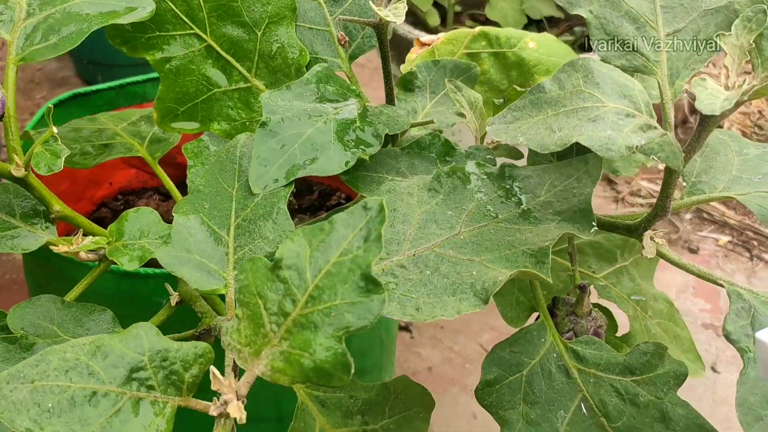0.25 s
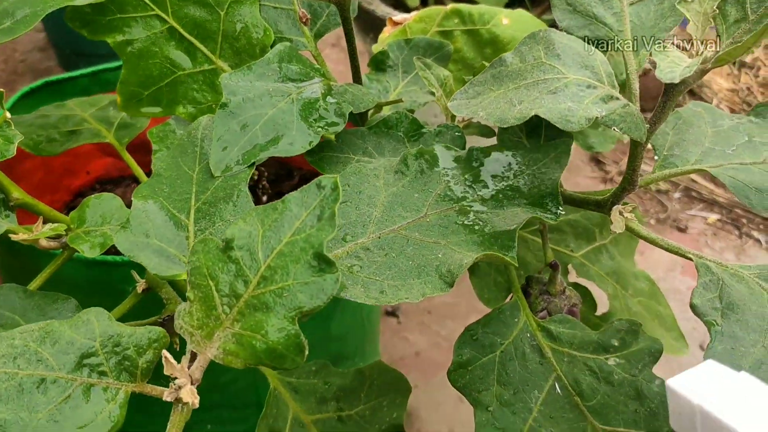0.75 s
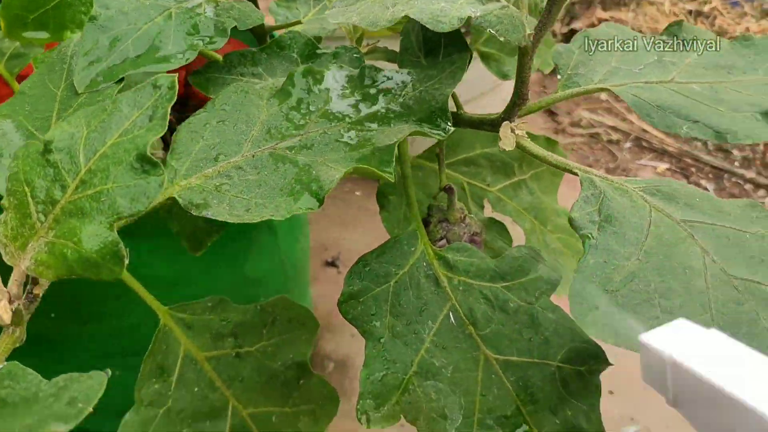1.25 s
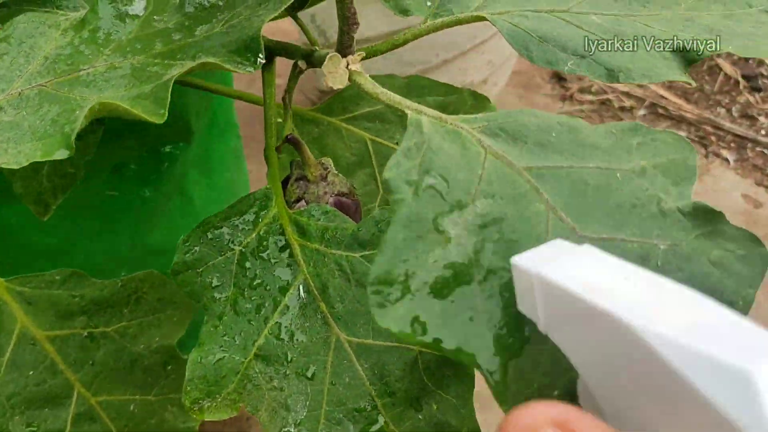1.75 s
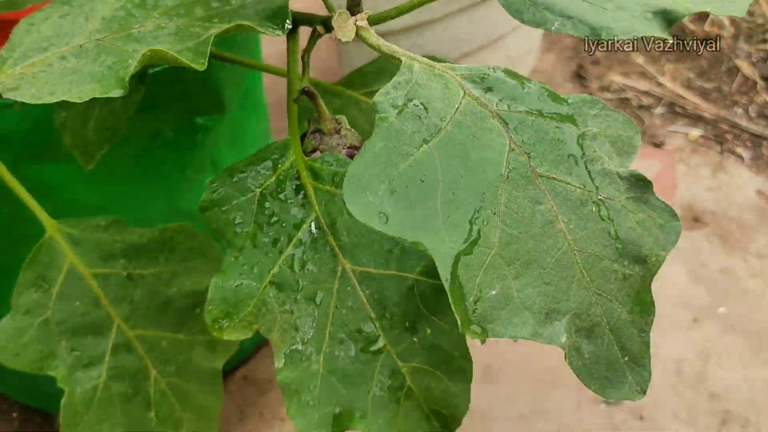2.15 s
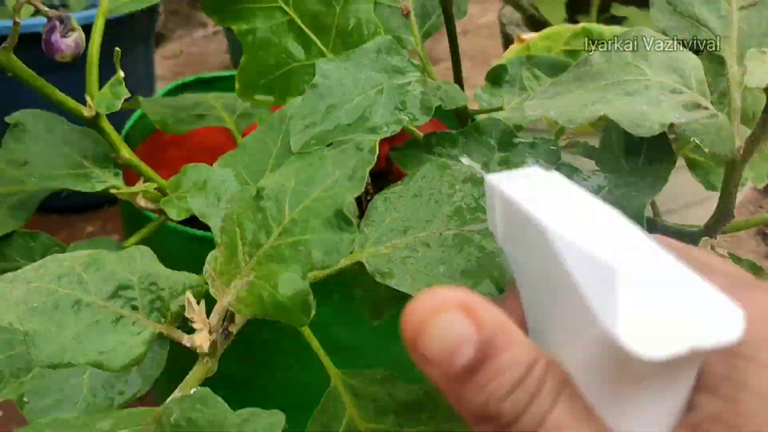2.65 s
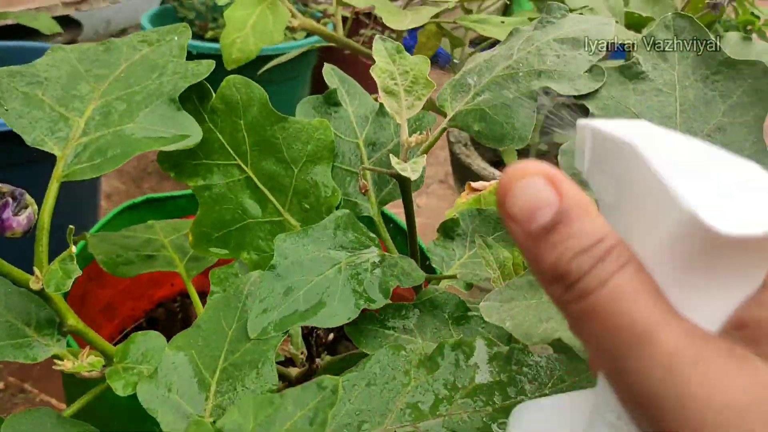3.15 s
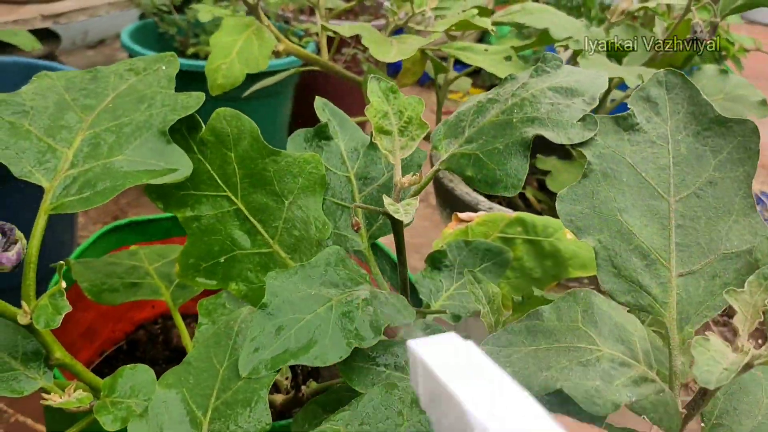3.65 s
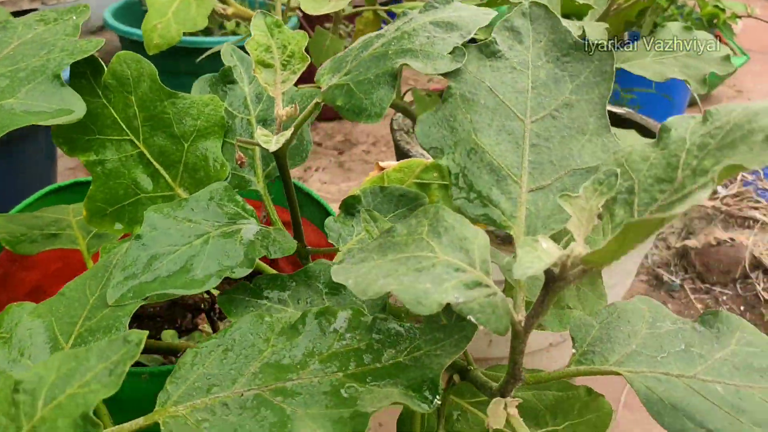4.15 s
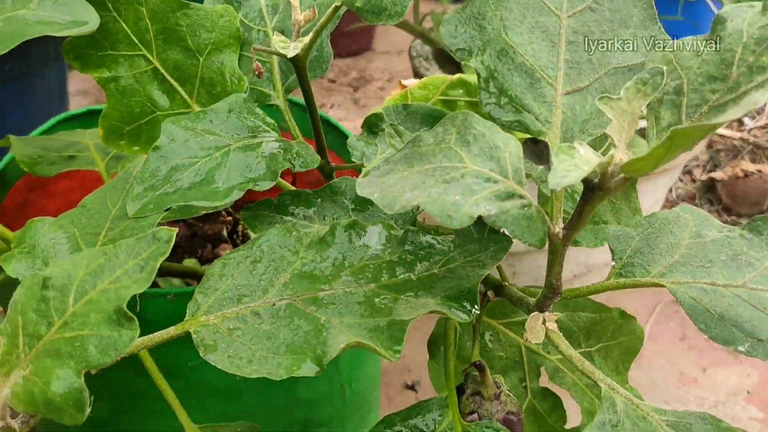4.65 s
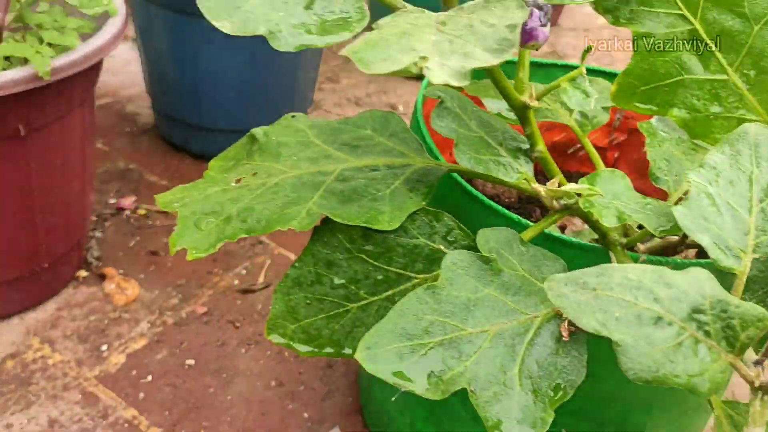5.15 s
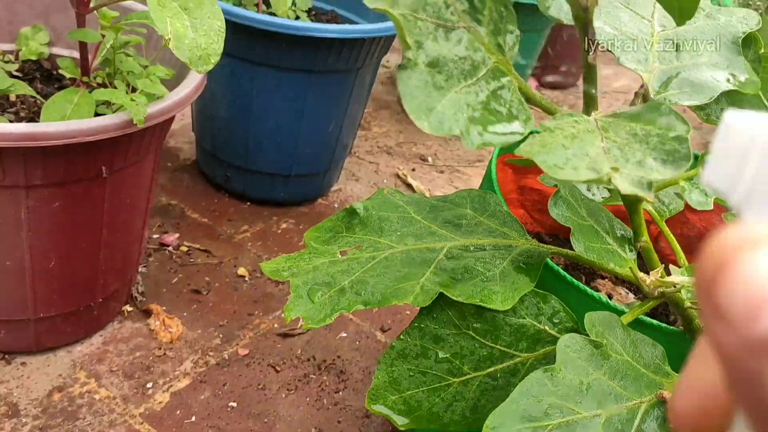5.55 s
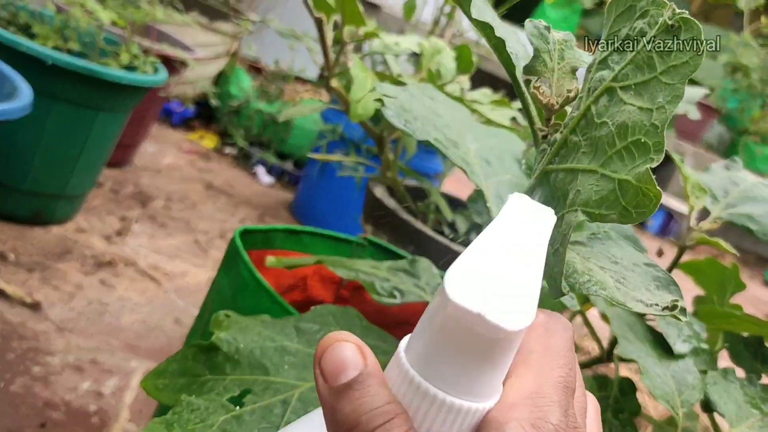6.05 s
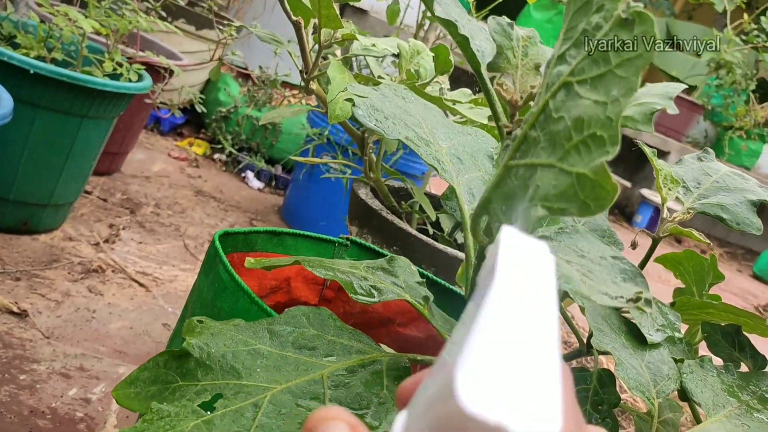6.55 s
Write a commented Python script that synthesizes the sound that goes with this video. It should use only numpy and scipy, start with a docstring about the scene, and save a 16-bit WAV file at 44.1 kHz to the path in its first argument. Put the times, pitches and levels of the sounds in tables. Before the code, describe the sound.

Close, rapid spray-bottle squirts hiss and patter on leaves, each with a hollow pump knock and trigger click, over a soft breezy garden background.

```python
"""Garden: a hand-held trigger bottle squirts water onto leaves, about four times a second, close by.
Each stroke: water churns in the pump, mist hisses out and patters down; piston knocks and trigger clicks
are decaying modes with noise. Air sips back through the nozzle as gliding noise bands in hiss.
Light wind buffets the two microphone ports; the yard answers with a faint echo."""
import sys
import numpy as np
from scipy import signal
from scipy.fft import rfft, irfft, next_fast_len
from scipy.io import wavfile
from scipy.ndimage import map_coordinates

SR = 44100
rng = np.random.default_rng(int(sys.argv[2]) if len(sys.argv) > 2 else 0)


def to_wav(s):
    """Save 16-bit WAV."""
    ch = np.atleast_2d(s).T  # columns
    pcm = np.round(np.clip(ch, -1, 1) * 32767)  # PCM
    wavfile.write(sys.argv[1], SR, pcm.astype(np.int16))


N = 299439

# pump strokes: [jet centre t/s, jet length/s, relative hiss level/dB, relative body level/dB,
# centre of the jet's colour peak f/Hz, churn lead before the jet/s, relative churn level/dB]
STROKE_ROWS = [(0.231, 0.069, -44.5, -8.5, 6000, .04, -67), (0.449, 0.077, -44.5, -14, 1500, 0.026, -40.5),
               (.672, 0.08, -51.5, -0.5, 8750, 0.037, -42.5), (0.897, 0.076, -52, -2.5, 1500, 0.039, -49.5),
               (1.128, 0.053, -49.5, -6.5, 5130, 0.048, -42), (1.341, 0.092, -49, -7.5, 1350, 0.037, -44),
               (1.561, 0.057, -42, -3, 7500, 0.04, -39.5), (1.78, 0.05, -38.5, -2, 2800, 0.049, -47.5),
               (1.997, 0.053, -41, -3.5, 3730, 0.03, -40.5), (2.206, 0.051, -46, -8.5, 1360, 0.041, -40),
               (2.414, 0.046, -38, -2, 2660, .037, -43), (2.602, 0.065, -50.5, -7, 1400, 0.028, -41.5),
               (2.801, 0.091, -50, -5.5, 4650, 0.022, -50), (3.004, 0.044, -43, -10.5, 1400, .007, -38),
               (3.215, 0.074, -50, -6.5, 1380, 0.021, -41), (3.534, 0.043, -44.5, -13.5, 5540, .06, -56),
               (3.749, 0.054, -41.5, -24, 6400, 0.037, -39), (3.983, .045, -52.5, 0, 7850, 0.056, -42.5),
               (4.194, 0.052, -48, -5, 3750, 0.045, -42.5), (4.418, 0.055, -44.5, -5.5, 3980, 0.033, -36.5),
               (4.641, 0.081, -50, -2, 2970, 0.045, -41), (4.867, 0.048, -51, -5, 1500, 0.099, -44.5),
               (5.111, 0.056, -53.5, -9.5, 5270, 0.12, -40.5),
               (5.285, 0.089, -57, -5.5, 4700, 0.0036, -42.5), (5.547, .051, -39, -6, 6760, 0.047, -59),
               (5.775, 0.064, -43, -2.5, 7160, 0.12, -46.5), (6.131, 0.043, -51.5, -8, 1900, 0.053, -59),
               (6.378, 0.053, -52, -6, 1850, 0.041, -54), (6.638, 0.046, -54.5, -4, 1840, 0.14, -57.5)]
# piston knocks in the filled bottle:
# [t/s, relative level/dB, nominal pitch f/Hz, hardness of the upper modes/(dB per octave)]
KNOCK_ROWS = [(.326, -37, 530, 3.5), (0.537, -35, 460, 2), (0.765, -35.5, 460, -6), (.991, -35, 450, -6),
              (1.039, -36.5, 520, 9), (1.209, -33.5, 440, -4), (1.299, -32, 514, 4), (1.422, -32, 458, 4.5),
              (1.693, -36.5, 807, 5), (1.87, -32, 440, 6), (2.082, -33, 455, -13), (2.277, -32, 420, -2.5),
              (2.495, -35, 445, 2), (2.696, -31.5, 466, 4.5), (2.912, -28, 714, 0.5), (3.0, -29, 497, 5.5),
              (3.106, -24, 453, 3), (3.319, -29.5, 450, -10), (3.621, -33, 417, 6), (3.833, -34, 495, 7),
              (3.888, -37.5, 805, 0), (4.061, -34, 412, 5.5), (4.294, -31.5, 418, -3),
              (4.507, -38, 436, -7), (4.729, -33.5, 454, 3.5), (4.817, -33, 480, 6), (4.961, -28.5, 680, 0),
              (5.048, -37.5, 818, 1), (5.192, -32, 377, 4), (5.428, -36.5, 546, 1.5),
              (5.492, -34, 636, -10), (5.632, -36.5, 793, 3.5), (5.731, -29.5, 790, 3.5),
              (5.867, -41, 803, 1), (6.241, -41, 627, 15), (6.328, -42.5, 620, 3), (6.478, -37.5, 553, -15),
              (6.502, -33.5, 587, -24), (6.585, -40.5, 580, -7), (6.75, -30, 648, 9.5)]
# light taps on the bottle wall: [nominal f/Hz, relative level/dB, t60/s]
WALL_MODES = [(250, -10.5, 0.03), (526, 2, 0.02), (807, -1.5, 0.018), (1500, -3.5, 0.015)]
# spectrum of the fine spray hiss: [f/Hz, relative level/dB]
HISS_SPECTRUM = [(300, -50), (1500, -5), (3000, -5), (4500, -5.5), (7000, -2.5), (9500, 1.5), (12000, -3.5),
                 (15000, -8.5), (16500, -25)]
# spectrum of the pump's rough noise: [f/Hz, relative level/dB]
PUMP_SPECTRUM = [(120, -53), (240, -0.5), (330, -12), (480, 0), (780, -3), (1100, -12.5), (1500, -9),
                 (2500, -14.5), (6000, -30.5), (15000, -26.5)]


def amp(db):
    """Amplitude ratio of a level in dB."""
    return 10 ** (np.asarray(db) / 20)


def unit(x):
    """x scaled to rms 1."""
    return x / np.sqrt(np.mean(x ** 2) + 1e-20)


def along(points, hz):
    """(Hz, value) points interpolated on a log frequency axis."""
    f, v = np.transpose(points)
    return np.interp(np.log(hz + 1), np.log(f + 1), v)


def at(rows, when_s):
    """Each column after the time, interpolated at the given moments."""
    s, *cols = np.transpose(rows)
    return [np.interp(when_s, s, c) for c in cols]


def wobble(rate_hz):
    """A smooth random curve, rate_hz knots a second."""
    knots = rng.standard_normal(int(N * rate_hz / SR) + 4)
    return map_coordinates(knots, [np.arange(N) * rate_hz / SR])


def filtered(x, response):
    """x shaped by a gain over frequency."""
    m = next_fast_len(N + SR // 2)
    return irfft(rfft(x, m) * response(np.fft.rfftfreq(m, 1 / SR)), m)[..., :N]


def stereo(mid, side, side_db):
    """Left and right from a shared part and a difference."""
    return np.array([mid + amp(side_db) * side, mid - amp(side_db) * side])


def panned(db):
    """Channel gains for a left-right level difference."""
    halves = [[db / 2], [-db / 2]] if np.ndim(db) == 0 else [db / 2, -db / 2]
    gain = amp(halves)
    return gain / np.sqrt(np.mean(gain ** 2, axis=0))


def rush(spectrum, side_db, grain_db=0, grain_hz=500):
    """Coloured stereo noise whose strength flutters in short grains."""
    white = rng.standard_normal((2, N)) * amp(grain_db * wobble(grain_hz))
    coloured = unit(filtered(white, lambda hz: amp(along(spectrum, hz))))
    return stereo(*coloured, side_db)


def swell(t, length_s, steep):
    """A rounded rise and fall around t = 0."""
    return np.exp(-np.abs(2 * t / length_s) ** steep / 2)


def add(track, s, sound):
    """Mix a sound into the track at a time."""
    i = round(s * SR)
    a, b = max(i, 0), min(i + sound.shape[-1], N)
    if a < b:
        track[..., a:b] += sound[..., a - i:b - i]


def speckle(hz, depth_db, spacing_hz):
    """Reflections off nearby leaves: a random gain ripple over frequency, partly shared by the ports."""
    knots = rng.standard_normal((3, 200))
    shared, left, right = [map_coordinates(k, [hz / spacing_hz], mode="mirror") for k in knots]
    gain = amp(depth_db * (.8 * shared + .6 * np.array([left, right])))
    return gain / np.sqrt(np.mean(gain ** 2))


def droplets(density_hz):
    """Single drop impacts of widely varying size, density_hz a second, as stereo noise of rms 1."""
    hits = (rng.random(N) < density_hz / SR) * amp(7.6 * rng.standard_normal(N))
    pair = hits * rng.standard_normal((2, N))
    return unit(filtered(pair, lambda hz: amp(along(HISS_SPECTRUM, hz))))


def outdoors():
    """Wind buffets the two ports unevenly, over the garden's soft background."""
    # slow rise and fall of the breeze: [t/s, relative level/dB]
    breeze = [(0, -52.5), (1.3, -51.5), (2.3, -44.5), (3.1, -39), (4.2, -43), (4.7, -49.5), (5.4, -46.5),
              (6, -54.5), (6.79, -55)]
    # puffs of air on the ports: [centre t/s, length/s, relative level/dB]
    puffs = [(1.852, 0.031, -35.5), (2.01, 0.045, -33), (2.274, 0.064, -37), (2.732, 0.077, -31),
             (3.107, .17, -27), (3.535, 0.032, -40), (3.842, 0.044, -31.5), (4.29, 0.048, -32),
             (4.78, .035, -38), (5.089, 0.036, -40.5), (5.388, 0.052, -33)]
    # garden background: [t/s, relative level/dB]
    garden = [(0, -45.5), (2.6, -46), (3.4, -48), (4, -46), (5.7, -46.5), (5.87, -54.5), (6.12, -47),
              (6.79, -45)]
    # spectrum of the wind on the ports: [f/Hz, relative level/dB]
    buffet_spectrum = [(12, -25), (25, 4), (42, 1), (70, -8), (120, -18.5), (200, -31.5), (400, -47),
                       (1500, -75)]
    # spectrum of the garden background: [f/Hz, relative level/dB]
    air_spectrum = [(30, -2), (70, 3.5), (130, -7.5), (250, -11.5), (330, -15.5), (500, -18.5),
                    (1250, -24.5), (1580, -21), (2000, -23.5), (2700, -23), (3400, -24.5), (5000, -26.5),
                    (10000, -26), (15500, -39)]
    t = np.arange(N) / SR
    flow = amp(at(breeze, t)[0])
    for s, length_s, db in puffs:
        flow = flow + amp(db) * swell(t - s, length_s, steep=2.07)
    buffet_db = 20 * np.log10(flow)
    garden_db, = at(garden, t)
    # the left port faces the wind, and more so in gusts
    pan_db = 8.5 + 0.4 * (buffet_db + 44.5)
    gusts = rush(buffet_spectrum, side_db=-2, grain_db=2, grain_hz=25)
    wind = amp(buffet_db - 3.5) * gusts * panned(pan_db)
    # the low background reaches both ports alike, the high one does not
    left, right = rush(air_spectrum, side_db=0, grain_db=.8, grain_hz=200)
    apart_db = [(60, -35), (400, -5.5), (3000, 1.5), (9000, 1.0)]
    apart = filtered((left - right) / 2, lambda hz: amp(along(apart_db, hz)))
    background = stereo((left + right) / 2, apart, side_db=-0.5)
    return wind + amp(garden_db - 5.0 + wobble(8)) * background


def sips():
    """Air drawn through the wet nozzle: a thin gliding whistle that spreads into broader resonances."""
    # air sips: [centre t/s, length/s, relative level/dB, start f/Hz, end f/Hz]
    sip_rows = [(.033, .026, -52, 4780, 4420), (.18, 0.047, -51.5, 4190, 5620),
                (0.468, 0.058, -48.5, 4580, 5000), (0.584, .038, -46, 4340, 4880),
                (.672, .039, -46, 4310, 5340), (0.768, 0.043, -45, 4200, 4700),
                (0.886, 0.044, -47.5, 4220, 4770), (1.047, 0.043, -47, 4250, 5000),
                (1.626, 0.024, -53, 4440, 4510), (1.844, 0.045, -50, 4480, 4660),
                (2.121, .033, -54.5, 3700, 3550), (2.341, 0.041, -49, 5090, 4400),
                (2.508, 0.038, -51.5, 4990, 4870), (2.778, .04, -50, 4930, 5400),
                (3.034, 0.048, -48.5, 4880, 4910), (3.23, .055, -55.5, 4850, 5600),
                (3.609, 0.046, -55, 4040, 4390), (3.835, 0.039, -56, 3400, 4210),
                (4.07, .056, -60.5, 3870, 3170), (4.315, 0.03, -59.5, 3400, 3370),
                (4.702, 0.032, -55.5, 3540, 4300), (6.169, .027, -50.5, 4750, 4990),
                (6.58, 0.054, -61.5, 5580, 5730)]
    # sip resonances: [multiple of the gliding f, relative level/dB, width/Hz, delay/sip length]
    nozzle = [(.63, -12.5, 250, 0.013), (0.999, 5.5, 116, 0.0041), (1.19, 0.5, 390, 0.083),
              (2.06, 0, 230, -0.032), (2.251, -5, 480, 0.19), (2.751, -8, 600, -0.1)]
    out, draught = np.zeros((2, N)), np.zeros(N)
    t = np.arange(-SR // 10, SR // 10) / SR
    offset_hz = np.fft.fftfreq(len(t), 1 / SR)
    grid_hz = np.fft.rfftfreq(len(t), 1 / SR)
    for s, length_s, db, start_hz, end_hz in sip_rows:
        add(draught, s + t[0], amp(db - 4) * swell(t, length_s, steep=4.4))
        hz = np.interp(t, [-.65 * length_s, .65 * length_s], [start_hz, end_hz])
        phase = 2 * np.pi * np.cumsum(hz) / SR
        pair = np.zeros((2, len(t)))
        for multiple, level_db, width_hz, delay in nozzle:
            white = rng.standard_normal((2, len(t))) + 1j * rng.standard_normal((2, len(t)))
            eddies = np.fft.ifft(white / (1 + (offset_hz / width_hz) ** 2))
            flow = swell(t - delay * length_s, length_s, steep=2.6)
            # shift the slow noise up to the gliding resonance
            band = unit((eddies * np.exp(1j * multiple * phase)).real)
            pair += amp(level_db) * flow * band
        colour = speckle(grid_hz, depth_db=3, spacing_hz=330)
        whistle = irfft(rfft(stereo(*pair, side_db=0.0)) * colour, len(t))
        add(out, s + t[0], amp(db) * whistle)
    out += draught * rush(HISS_SPECTRUM, side_db=2)
    # water in the gap makes the whistle and its hiss flutter
    return out * amp(2.2 * wobble(160) - .5)


def churn(tap_hz=330):
    """Water forced past the valve makes it chatter: uneven taps ring the wall over a rough rush."""
    rush_s = 0.021
    force = np.zeros(N)
    t = np.arange(-SR // 10, SR // 10) / SR
    for s, *_, lead_s, db in STROKE_ROWS:
        add(force, s - lead_s + t[0], amp(db) * swell(t, rush_s, steep=1.75))
    # one tap per whole turn of a wandering rate
    turns = np.floor(np.cumsum(tap_hz * amp(4 * wobble(200))) / SR)
    taps = np.diff(turns, prepend=0) * amp(4.3 * rng.standard_normal(N)) * rng.choice([-1, 1], N)
    u = t[t >= 0]
    wall = sum(amp(db - 60 * u / t60_s) * np.sin(2 * np.pi * hz * u) for hz, db, t60_s in WALL_MODES)
    chatter = unit(signal.fftconvolve(taps, wall)[:N])
    rough = rush(PUMP_SPECTRUM, side_db=-8, grain_db=4, grain_hz=350)
    return amp(-2.0) * force * (chatter + rough) * panned(2.5)


def ticks(count=2, ring_hz=10400):
    """The trigger's pivot slips around each churn: faint dry ticks of ring and noise."""
    spread_s, scatter_db = .02, 3
    out = np.zeros((2, N))
    t = np.arange(SR // 32) / SR
    for s, *_, lead_s, db in STROKE_ROWS:
        for offset, size, detune in rng.standard_normal((count, 3)):
            phase = rng.standard_normal((2, 1))
            ring = np.sin(2 * np.pi * ring_hz * np.exp(.08 * detune) * t + phase)
            ring = ring * amp(-60 * t / 0.0068)
            crack = amp(-6.5 - 60 * t / 0.017) * rng.standard_normal((2, len(t)))
            level = amp(db + 3 + scatter_db * size)
            add(out, s - lead_s + spread_s * offset, level * (ring + crack))
    return out


def mist():
    """Pressure swells and fades per squirt; the jet hisses and drums on a leaf, a new colour each time."""
    # spectrum of the jet's duller body: [f/Hz, relative level/dB]
    body_spectrum = [(150, -52), (450, -10.5), (1100, -3), (1550, 0), (2100, 1), (2700, 0), (4200, 3.5),
                     (6500, -3.5), (12000, -20)]
    out, fall = np.zeros((2, N)), np.zeros(N)
    t = np.arange(-SR // 5, SR // 5) / SR
    hz = np.fft.rfftfreq(len(t), 1 / SR)
    hiss, body = unit(amp(along(HISS_SPECTRUM, hz))), unit(amp(along(body_spectrum, hz)))
    for s, length_s, db, body_db, peak_hz, *_ in STROKE_ROWS:
        # softer jets have a stronger colour peak
        peak_db = 4.5 - 0.3 * (db + 48)
        # the sheet of water breaks up unevenly, so the hiss is grainy
        grain = map_coordinates(rng.standard_normal(1000), [(t - t[0]) * 800], mode="mirror")
        white = rfft(rng.standard_normal((2, 2, len(t))) * amp(1.97 * grain))
        jet = stereo(*white[0], side_db=0.9) * hiss
        jet = jet + amp(body_db + 3.0) * stereo(*white[1], side_db=-7.0) * body
        colour_peak = amp(peak_db * np.exp(-(np.log((hz + 1) / peak_hz) / 0.14) ** 2))
        ripple = speckle(hz, depth_db=2.4, spacing_hz=300)
        jet = irfft(jet * colour_peak * ripple, len(t))
        add(out, s + t[0], amp(db + 1.25) * swell(t, length_s, steep=2.94) * jet)
        # heavier drops keep landing after the jet
        onset = np.clip(t / 0.033 + 1, 0, 1)
        add(fall, s + t[0], amp(db - 60 * np.abs(t) / 0.34) * onset)
    return out + amp(-23) * fall * droplets(density_hz=480)


def spits(density_hz=260, level_db=-9):
    """While the jet runs, fat drops spit onto the leaves."""
    flow = np.zeros(N)
    t = np.arange(-SR // 5, SR // 5) / SR
    for s, length_s, db, *_ in STROKE_ROWS:
        add(flow, s + t[0], amp(db) * swell(t, length_s, steep=3.4))
    return amp(level_db) * flow * droplets(density_hz)


def clicks():
    """Hard plastic snaps: a very short ring, a crack with a brief rattle, a dull answer of the bottle."""
    # trigger clicks: [t/s, relative level/dB, ring f/Hz, rattle level relative to the crack/dB]
    click_rows = [(0.2979, -39, 9400, -20), (0.349, -33.5, 11000, -22), (.374, -31, 8600, -2),
                  (0.592, -28.5, 10800, -16), (.6045, -33, 10200, -16), (0.6174, -32.5, 10000, -7),
                  (0.818, -32, 10600, -9), (1.075, -32, 10300, -6), (1.478, -38, 10800, -12),
                  (1.495, -36.5, 10200, -7), (1.694, -34.5, 9950, -20), (1.953, -35.5, 10100, -12),
                  (2.149, -31.5, 11300, -3), (2.3277, -21, 10200, -9), (2.5474, -31.5, 9540, -19),
                  (2.7385, -36, 11300, 0.5), (2.9572, -30.5, 9670, -4), (3.156, -31, 12100, -20),
                  (3.3581, -35, 9200, -3), (3.666, -37, 7900, -2), (3.7052, -32.5, 9700, -16),
                  (3.907, -35, 9500, -5), (4.1117, -26.5, 9600, -35), (4.132, -34.5, 10700, -11),
                  (4.3441, -29, 8370, -4), (4.3795, -30, 12600, -21), (4.554, -35, 8950, -3),
                  (4.776, -29, 7200, -5), (5.001, -31, 9750, 0.5), (5.238, -26.5, 9400, -13),
                  (5.269, -33.5, 8320, -8), (5.448, -23.5, 7830, -23), (5.6769, -23.5, 9400, -17),
                  (6.2611, -34, 9700, -2), (6.5162, -20, 8730, -19), (6.773, -34.5, 8040, -1)]
    # where the hand holds the trigger: [t/s, left-right difference/dB]
    trigger_pan = [(.3, 14), (.4, 2), (2.3, 2), (2.8, -1.5), (3.8, -2.5), (4.6, 1)]
    out, crack, thud = np.zeros((2, N)), np.zeros((2, N)), np.zeros(N)
    t = np.arange(SR // 16) / SR
    contact = 1 - np.exp(-t / .00022)
    for s, db, hz, rattle_db in click_rows:
        pan_db, = at(trigger_pan, s)
        # the bottle's answer grows only slowly with the click
        thud_db = -41.5 + 0.2 * (db + 33)
        phase = rng.uniform(0, 2 * np.pi, (2, 1, 1)) + rng.standard_normal((2, 2, 1))
        modes = np.sin(2 * np.pi * hz * t + phase[0])
        modes = modes + .5 * np.sin(2 * np.pi * 1.2 * hz * t + phase[1])
        ring = amp(db + 3.5 - 60 * t / 0.0074) * contact * modes
        add(out, s + .0005, ring * panned(pan_db))
        decay = amp(-60 * t / 0.018) + amp(rattle_db - 60 * t / 0.077)
        add(crack, s + 0.00039, amp(db - 6.5) * contact * decay * panned(pan_db))
        add(thud, s + 0.00076, amp(thud_db - 60 * t / 0.035))
    snap = rush(HISS_SPECTRUM, side_db=-1, grain_db=1.5, grain_hz=1200)
    return out + crack * snap + thud * rush(PUMP_SPECTRUM, side_db=-5.5)


def knocks():
    """The piston meets its stop: quickly damped modes of the filled bottle, then a brief shudder."""
    # knock modes: [nominal multiple of the pitch, relative level/dB, t60/s]
    bottle = [(1, 1.5, 0.028), (1.6, -1.5, 0.014), (.5, -2, 0.02), (2.9, -6.5, 0.0081)]
    out, shudder = np.zeros((2, N)), np.zeros(N)
    t = np.arange(SR // 10) / SR
    for s, db, hz, hard_db in KNOCK_ROWS:
        ring = 0
        for multiple, level_db, t60_s in bottle:
            mode_hz = hz * multiple * np.exp(.06 * rng.standard_normal())
            phase = .22 * rng.standard_normal((2, 1))
            mode_db = level_db + hard_db * np.log2(max(multiple, 1)) + rng.normal(0, 2)
            ring = ring + amp(mode_db - 60 * t / t60_s) * np.sin(2 * np.pi * mode_hz * t + phase)
        scuff = amp(hard_db - 34 - 60 * t / 0.0068) * rng.standard_normal((2, len(t)))
        contact = 1 - np.exp(-t / 0.00051)
        add(out, s + 0.00092, amp(db - 2.5) * (ring + scuff) * contact)
        add(shudder, s + 0.00098, amp(db - 12.5 - 60 * t / 0.079))
    rough = rush(PUMP_SPECTRUM, side_db=-3.5, grain_db=6.5, grain_hz=250)
    return (out + shudder * rough) * panned(1.8)


def rattles(count=4, spread_s=.04, level_db=-16):
    """After each knock the loose pump parts tap the bottle wall lightly, at uneven moments."""
    out = np.zeros((2, N))
    t = np.arange(SR // 10) / SR
    for s, db, *_ in KNOCK_ROWS:
        for offset, size in rng.standard_normal((count, 2)):
            detune = np.exp(.08 * rng.standard_normal())
            ring = 0
            for hz, mode_db, t60_s in WALL_MODES:
                decay = amp(mode_db + rng.normal(0, 3.9) - 60 * t / t60_s)
                ring = ring + decay * np.sin(2 * np.pi * hz * detune * t)
            tick = amp(-6 - 60 * t / .008) * rng.standard_normal((2, len(t)))
            level = amp(db + level_db + 2 * size)
            add(out, s + 0.00408 + spread_s * abs(offset), level * (ring + tick))
    return filtered(out, lambda hz: 1 / (1 + (hz / 4500) ** 2))


def spring(ring_hz=11400, beat_hz=450):
    """The steel return spring pings with two close, high modes."""
    # spring pings: [t/s, level/dB]
    ping_rows = [(1.2353, -38), (2.0597, -33), (2.6296, -23.5), (5.6141, -38), (6.3057, -24)]
    out = np.zeros((2, N))
    t = np.arange(SR // 16) / SR
    for s, db in ping_rows:
        phase = rng.uniform(0, 2 * np.pi) + 1.5 * rng.standard_normal((2, 2, 1))
        ring = np.sin(2 * np.pi * ring_hz * t + phase[0])
        ring = ring + .4 * np.sin(2 * np.pi * (ring_hz + beat_hz) * t + phase[1])
        add(out, s, amp(db - 60 * t / 0.024) * ring * (1 - np.exp(-t / 0.00019)))
    return out


def yard(x):
    """Paving, pots and walls answer faintly; each frequency dies at its own speed."""
    # echo decay: [f/Hz, t60/s]
    echo_decay = [(200, 0.073), (2000, 0.31), (12000, 0.14)]
    hz, t, z = signal.stft(rng.standard_normal((2, SR // 3)), SR, nperseg=256)
    decay = amp(-60 * t / along(echo_decay, hz)[:, None])
    tail = signal.istft(z * decay, SR, nperseg=256)[1]
    # 5 ms before the first answer
    tail = np.pad(tail / np.linalg.norm(tail[0]), ((0, 0), (SR // 200, 0)))
    return signal.fftconvolve(x, tail, axes=1)[:, :N]


def scene():
    """The sprayer near by, its faint echo and the open air."""
    air = outdoors()
    sprayer = sips() + churn() + ticks() + mist() + spits() + clicks() + knocks() + rattles() + spring()
    return sprayer + amp(-17.0) * yard(sprayer) + air


def record(dry):
    """A steep low-pass leaves almost nothing above the band limit."""
    top_hz = 15650
    return filtered(dry, lambda hz: 1 / (1 + (hz / top_hz) ** 120))


dry = scene()
out = record(dry)
to_wav(out)
```